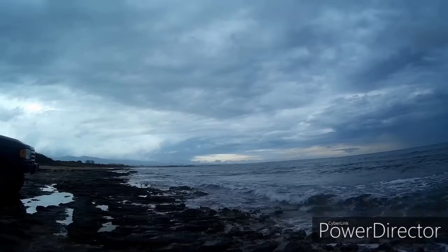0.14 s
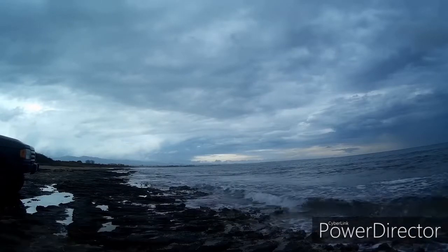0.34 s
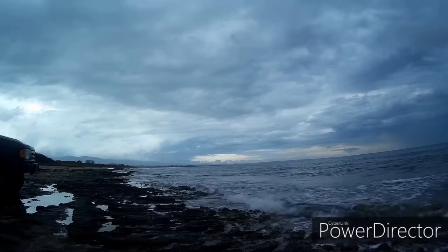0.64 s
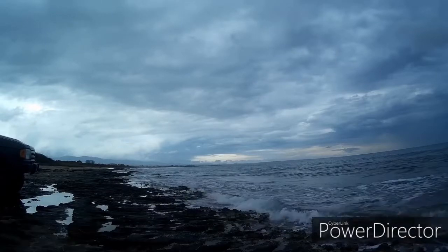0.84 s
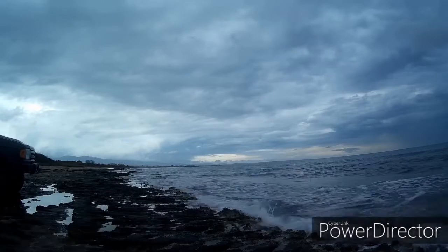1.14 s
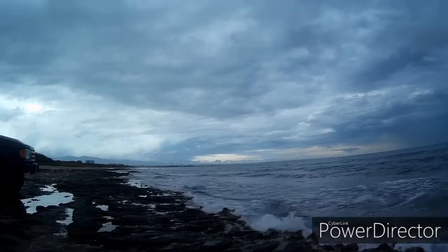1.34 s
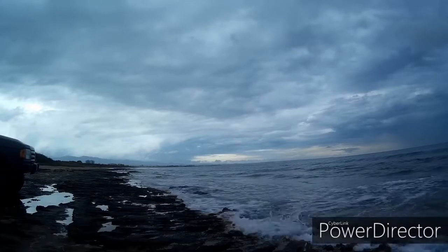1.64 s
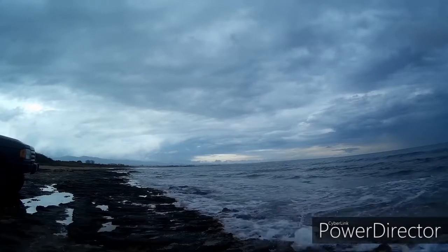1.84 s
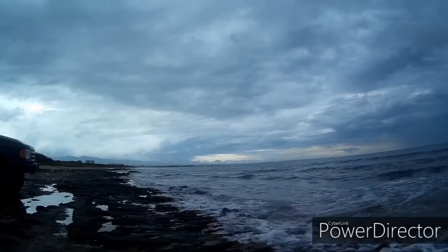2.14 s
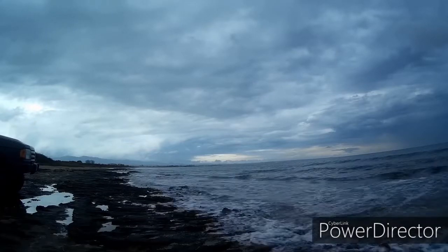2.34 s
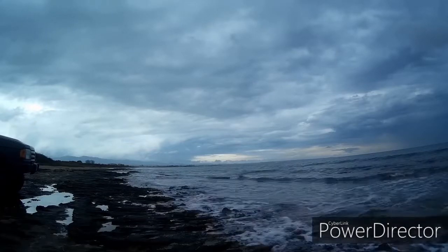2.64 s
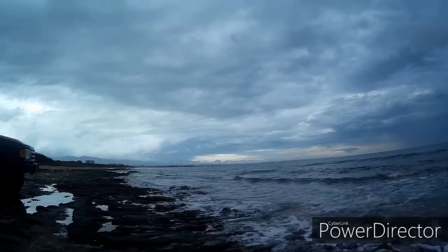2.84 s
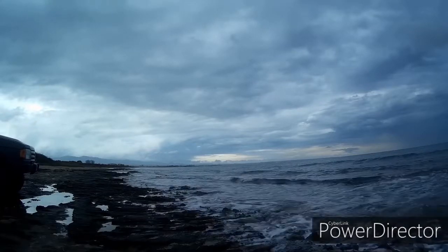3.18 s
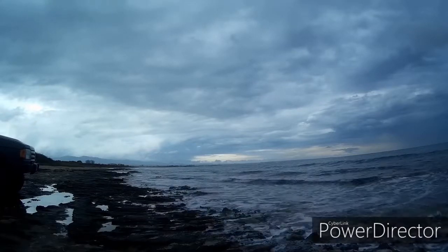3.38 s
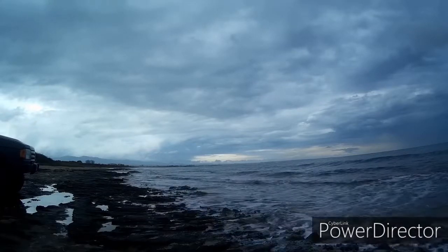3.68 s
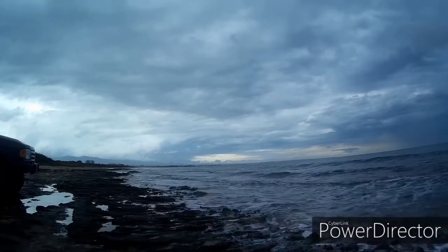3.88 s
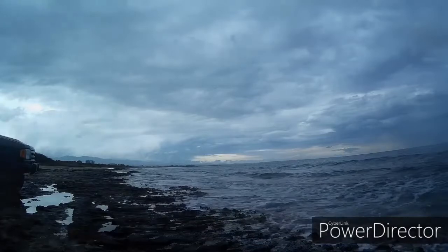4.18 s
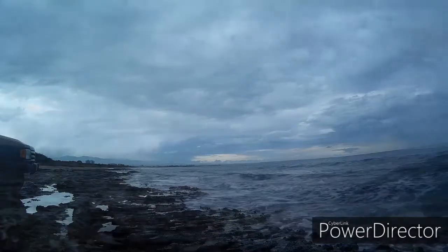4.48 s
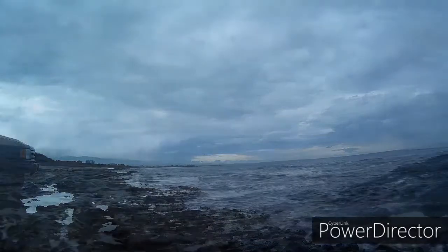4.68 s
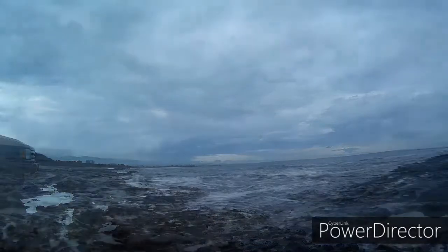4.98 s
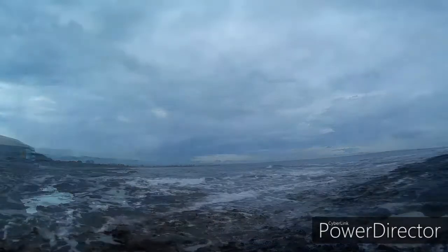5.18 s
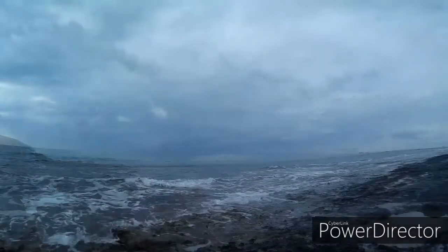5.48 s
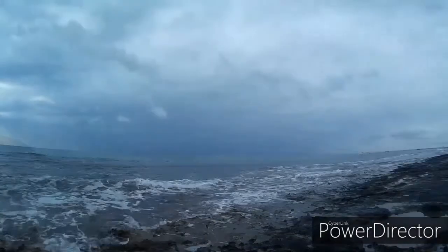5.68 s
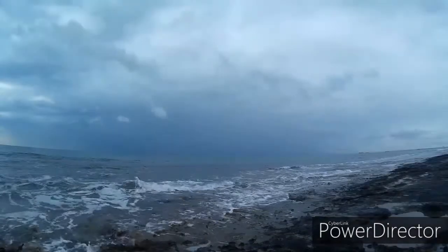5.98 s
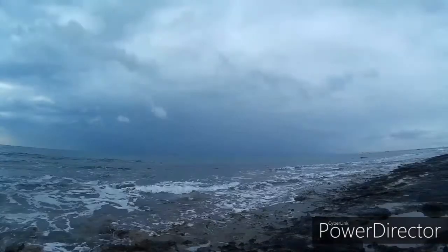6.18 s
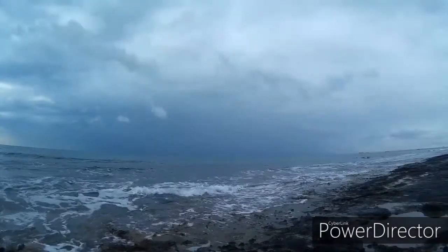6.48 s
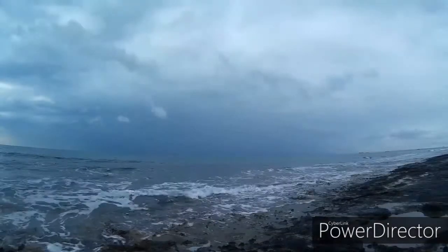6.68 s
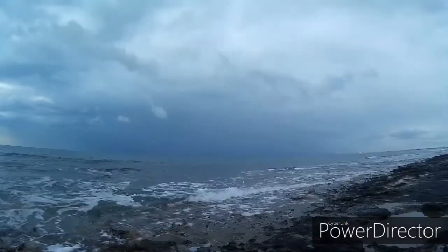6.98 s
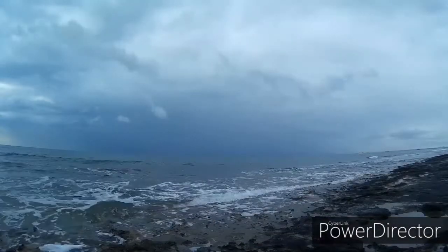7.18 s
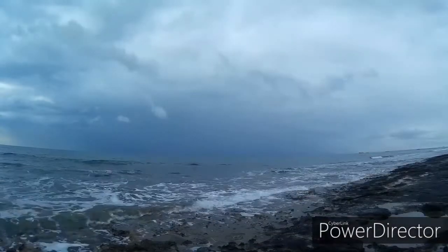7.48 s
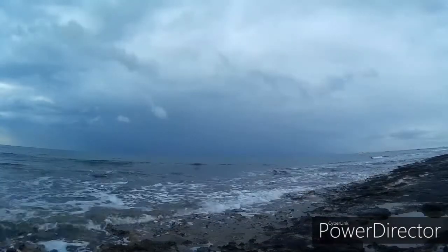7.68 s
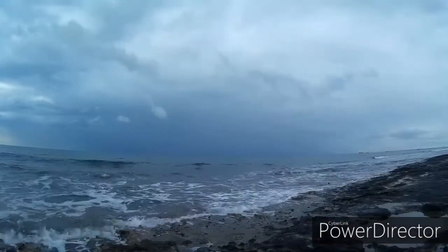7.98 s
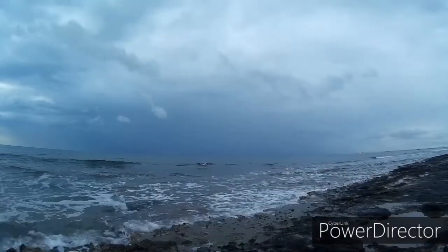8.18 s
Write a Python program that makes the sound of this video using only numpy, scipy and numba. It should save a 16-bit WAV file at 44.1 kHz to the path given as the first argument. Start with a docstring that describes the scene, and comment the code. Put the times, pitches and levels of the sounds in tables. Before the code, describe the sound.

Outdoors by the sea, a muffled, mid-heavy wash of bubbles blends with a smooth roar of farther breakers. Three surges come: strong early, gentler in the middle, strong again at the end. Hollow water slaps and tiny spray ticks ride on the breaks. Between them remain soft wind rumble, a faint wavering low hum and thin steady hiss; the tone shifts slightly midway.

```python
"""Flat rocks on a shore, heard from a small camera in a closed housing: three waves break and drain. The surf
is a swarm of ringing bubbles over a smooth noise roar of farther breakers. Water slaps and spray drops are
quick bubble clusters; filtered noise makes wind rumble, a wavering hum and microphone hiss. Partway the colour
of the surf and the hum level shift."""
import sys
import numpy as np
from scipy import signal
from scipy.fft import rfft, irfft
from scipy.io import wavfile
from scipy.ndimage import uniform_filter1d, map_coordinates
from numba import njit

SR = 44100
rng = np.random.default_rng(int(sys.argv[2]) if len(sys.argv) > 2 else 0)


def put_to_file(sound):
    """Save the sound as 16-bit audio at rate SR, in the file named by the first command-line argument."""
    columns = np.atleast_2d(sound).T  # one column per channel
    safe = np.clip(columns, -1, 1)
    whole_steps = np.round(safe * 32767)
    wavfile.write(sys.argv[1], SR, whole_steps.astype(np.int16))


def decibels_to_gain(level_db):
    """Convert a level in decibels to a linear amplitude gain (20 dB per decade)."""
    exponent = np.asarray(level_db, float) / 20
    return 10 ** exponent


N = 367353
T = np.arange(N) / SR

# middle pitch of the surf's parts, low to high: pockets, wash, upper wash, spray, fizz [f/Hz]
PART_PITCH = [170, 650, 1900, 4200, 9000]
# broad colour of sound through the housing [f/Hz, density level/dB]
HOUSING_COLOUR = [(24, -66), (40, -26), (139, -7), (207, -3), (426, -0.5), (533, -1), (835, -1),
                  (1180, -4.5), (1680, -5.5), (3130, -28), (4010, -30.5), (4900, -37.5), (8260, -46),
                  (11700, -56), (15400, -73)]
# start and end of the shift in colour and hum [t/s]
SHIFT_TIMES = [4.82, 5.45]


def unit(x):
    """Scales a signal to rms 1."""
    return x / np.sqrt(np.mean(x ** 2))


def read(points, hz):
    """Level in dB of a spectrum at hz, in straight lines over log frequency."""
    f, db = np.transpose(points)
    return np.interp(np.log(np.maximum(hz, 1)), np.log(f), db)


def tint(x, points):
    """Filters causally to the given spectrum: minimum phase from the folded cepstrum."""
    size = 2 ** 13
    hz = np.arange(size // 2 + 1) * SR / size
    cepstrum = irfft(np.log(decibels_to_gain(read(points, hz))))
    cepstrum[1:size // 2] *= 2
    cepstrum[size // 2 + 1:] = 0
    impulse = irfft(np.exp(rfft(cepstrum)))
    return signal.fftconvolve(x, impulse)[:N]


def walk(rate):
    """Slow random drift: levels held 1 / rate s, smoothed twice, rms 1."""
    hold = int(SR / rate)
    steps = np.repeat(rng.standard_normal(N // hold + 1), hold)
    smooth = uniform_filter1d(uniform_filter1d(steps, hold), hold)
    return unit(smooth[:N])


def shifted():
    """Progress of the shift in colour and hum, from 0 before to 1 after."""
    return np.interp(T, SHIFT_TIMES, [0, 1])


def part_place(hz):
    """Fractional place of a pitch among the surf's parts, over log frequency."""
    return np.interp(np.log(np.maximum(hz, 1)), np.log(PART_PITCH), np.arange(len(PART_PITCH)))


@njit
def ring(start, hz, cycles, size, glide, length, sr):
    """Each bubble is a damped sine whose pitch rises as it nears the surface."""
    out = np.zeros(length)
    for k in range(len(start)):
        span = cycles[k] * sr / hz[k]  # decay time in samples
        state = size[k] + 0j
        step = np.exp(2j * np.pi * hz[k] / sr - 1 / span)
        bend = np.exp(2j * np.pi * hz[k] / sr * glide / span)
        for i in range(start[k], min(length, start[k] + int(5 * span) + 2)):
            out[i] += state.imag
            state, step = state * step, step * bend
    return out


def force():
    """Force and foam of the surf in relative dB, as the waves rise, break and drain."""
    # three waves; foam is how much fine froth brightens the wash [t/s, force/dB, foam/dB]
    surge = [(0.0, -30.5, 0.5), (0.2, -32, 2), (0.55, -27.5, 1), (0.66, -28, 1), (0.79, -22.5, -2),
             (0.86, -27, 1), (0.9, -23.5, -0.5), (1.1, -25, 0.5), (1.36, -25.5, 0.5), (1.47, -29.5, 3),
             (1.66, -27.5, 0.5), (1.75, -29.5, 3), (1.86, -35.5, 4.5), (1.92, -35.5, 1), (2.02, -41, 1),
             (2.22, -43.5, -1.5), (2.45, -39.5, -0.5), (2.68, -41, 1), (2.84, -40, 0), (3.04, -38.5, -1),
             (3.12, -41, -0.5), (3.4, -42.5, 0), (3.75, -39.5, -1.5), (4.15, -43, 0.5), (4.6, -39.5, -1),
             (5.0, -37, 0), (5.28, -34.5, -0.5), (5.35, -31, 0), (5.46, -32.5, 0.5), (5.6, -31, 1),
             (5.84, -31.5, -0.5), (5.91, -34.5, 0), (6.1, -36, -1), (6.35, -35, -0.5), (6.88, -38.5, 0),
             (7.1, -35.5, 0), (7.28, -39, 1), (7.45, -34.5, 0.5), (7.57, -38.5, 0.5), (7.64, -32, 0),
             (7.662, -27, 1.5), (7.73, -24, 1), (7.95, -26, 0.5), (8.33, -27.5, 0)]
    s, force_db, foam_db = np.transpose(surge)
    return np.interp(T, s, force_db), np.interp(T, s, foam_db)


def parts():
    """Relative dB of each part of the surf: all follow the wave and churn together, each flickers alone."""
    # one row per part, low to high [level at middle force/dB, dB per dB of force, dB per dB of foam, change
    # after the shift/dB]
    balance = [(-34, 0.6, -2.4, 0.2), (-33, 1.0, -0.3, 0.18), (-33, 0.9447, 0.86, -0.5),
               (-30.5, 1.16, 1.01, -4.5), (-28.5, 1.21, 1.6, 2)]
    middle_force_db = -33
    force_db, foam_db = force()
    turn = shifted()
    froth_db = foam_db + 0.85 * walk(9)  # froth comes in patches
    churn_db = 0.66 * walk(70) + 0.61 * walk(18)
    levels = []
    for db, follow, froth, shift_db in balance:
        wave_db = db + follow * (force_db - middle_force_db) + froth * froth_db
        flicker_db = 0.55 * walk(7.7) + 0.73 * walk(30)
        levels.append(wave_db + shift_db * turn + churn_db + flicker_db)
    return np.array(levels)


def bubbles(part_db):
    """A swarm of trapped bubbles rings, low pitches more numerous per Hz; a few stand out of the crowd."""
    per_s, scatter_db = 12000, 2.5
    when, pitch, luck, turns = rng.random((int(per_s * N / SR), 4)).T
    start = (when * N).astype(np.int64)
    hz = 70 + 15000 * pitch ** 1.3
    db = map_coordinates(part_db, [part_place(hz), start], order=1)
    # the scatter narrows for pitches under 3 kHz
    db = db - scatter_db * np.log(1.0003 - luck) * np.minimum(hz / 3000, 1) ** 0.58
    # sized so that the swarm is near white before the housing colours it
    size = decibels_to_gain(db) * (hz / 1000) ** 0.56
    return ring(start, hz, 0.61 + 3.75 * turns, size, 0.02, N, 1. * SR)


def roar(part_db):
    """Farther breakers blur into noise, one band per part, crossfaded over log frequency."""
    place = part_place(np.arange(N // 2 + 1) * SR / N)
    noise = rfft(rng.standard_normal(N))
    out = np.zeros(N)
    for k, db in enumerate(part_db):
        band = np.clip(1 - abs(place - k), 0, 1)
        out += decibels_to_gain(db) * irfft(noise * band, N)
    return out


def housing(x):
    """The closed case dulls the sound and rings in the treble, differently after the shift near 5 s."""
    # rings and dips of the case, one list before and one after the shift [f/Hz, width/Hz, level/dB]
    cavities = ([(4000, 370, 3.5), (7700, 500, 0), (8540, 550, -3), (10260, 1050, 4.5), (12100, 800, 6.5)],
                [(4100, 600, 5.5), (7100, 440, 3), (8260, 900, 5), (10500, 1000, 4.5), (11500, 800, 4)])
    grid_hz = np.geomspace(20, 20000, 400)
    views = []
    for resonances in cavities:
        colour_db = read(HOUSING_COLOUR, grid_hz)
        for hz, width, db in resonances:
            colour_db = colour_db + db / (1 + (2 * (grid_hz - hz) / width) ** 2)
        views.append(tint(x, np.transpose([grid_hz, colour_db])))
    turn = shifted()
    return (1 - turn) * views[0] + turn * views[1]


def rumble():
    """Wind rumble: low-tinted noise whose level drifts slightly."""
    # spectrum of the wind [f/Hz, relative density level/dB]
    wind_colour = [(20, -1), (40, 0), (60, -4), (100, -0.5), (160, -30)]
    level_db = -58.5 + 0.5 * walk(3.22)
    return decibels_to_gain(level_db) * unit(tint(rng.standard_normal(N), wind_colour))


def hum():
    """A faint low hum: narrow-band noise that wavers, weaker after the shift."""
    # middle level before and after the shift [level/dB]
    hum_levels = [-61.5, -65]
    band = signal.butter(2, [55, 65], "band", fs=SR, output="sos")
    db = np.interp(T, SHIFT_TIMES, hum_levels) + 2.5 * walk(3.5)
    return decibels_to_gain(db) * unit(signal.sosfilt(band, rng.standard_normal(N)))


def hiss():
    """Steady microphone hiss: tinted noise at a fixed level."""
    # spectrum of the hiss [f/Hz, relative density level/dB]
    hiss_colour = [(1500, 21), (4000, -15), (9000, 8), (13000, 7), (15400, -10)]
    return decibels_to_gain(-85) * unit(tint(rng.standard_normal(N), hiss_colour))


def burst(events, ms, count, focus):
    """Each event traps a quick cluster of bubbles round its pitch, thickest at the start."""
    s, peak_db, hz, spread = (np.repeat(column, count) for column in np.transpose(events))
    # a cluster of like sizes rings longer: a plop rather than a splash
    cycles = focus / np.clip(spread, .1, 2)
    late, detune, sign = rng.random((len(s), 3)).T
    late[::count] = 0  # the first bubble leads its cluster
    start = ((s + .001 + late ** 1.5 * ms / 1000) * SR).astype(np.int64)
    pitch = np.minimum(hz * np.exp(spread * (detune - .5)), .4 * SR)
    # bubbles ringing at the same moment share the peak
    together = 1 + count * cycles / hz / (ms / 1000)
    # the broad dulling of the case is made up for in advance
    gain = decibels_to_gain(peak_db - read(HOUSING_COLOUR, pitch)) / np.sqrt(together)
    size = np.sign(sign - .5) * gain
    return ring(start, pitch, cycles * pitch / hz, size, 0.017, N, 1. * SR)


def slaps():
    """Water slaps rock and traps bubble clusters: narrow ones plop, wide ones splash."""
    # slaps on the rock [t/s, nominal peak level/dB, f/Hz, spread of pitch as a natural-log range]
    slap_events = [(0.569, -25, 708, 0.55), (0.727, -21, 1030, 0.59), (0.799, -12, 710, 0.91),
                   (0.874, -17, 440, .6), (0.892, -14, 594, 0.58), (0.935, -17, 660, 0.44),
                   (0.949, -19, 665, 0.71), (1.199, -17.5, 760, 0.55), (1.305, -14, 716, 0.54),
                   (1.644, -16.5, 880, 0.45), (1.679, -17, 750, .5), (2.495, -34, 478, .5),
                   (2.848, -24, 416, 0.56), (3.039, -31, 285, 0.5), (3.132, -30.5, 1330, 0.25),
                   (4.97, -18.5, 198, .3), (5.189, -24, 504, 0.57), (5.409, -18, 690, 0.51),
                   (5.497, -10.5, 710, 0.95), (5.511, -14, 820, 0.96), (5.586, -16.5, 800, 1),
                   (5.664, -20.5, 780, .5), (5.774, -25, 635, 0.32), (5.949, -24, 554, 0.36),
                   (6.179, -24, 820, 0.56), (7.008, -27, 533, .45), (7.359, -26, 637, .6),
                   (7.659, -15, 738, 0.34), (7.696, -8, 750, .45), (7.766, -18, 430, .4),
                   (7.849, -20, 643, .4), (7.882, -14.5, 1720, 0.2), (8.129, -21, 425, .45),
                   (8.259, -21, 790, 0.67)]
    return burst(slap_events, ms=12, count=14, focus=0.77)


def stray_drops(count):
    """Drops at random moments, as strong as the wave that throws them: time, level and pitch."""
    low_hz, high_hz = 5200, 8400
    when, pitch = rng.random((count, 2)).T
    db = force()[0][(when * N).astype(int)] - 18.5
    return np.transpose([when * N / SR, db, low_hz + pitch * (high_hz - low_hz)])


def spray():
    """Spray lands close by: clear drops and strays tick as tiny high bubble clusters."""
    # the clearest drops [t/s, nominal peak level/dB, f/Hz]
    clear_drops = [(0.5776, -40, 5390), (0.7527, -47, 6700), (1.1937, -39, 5200), (1.2555, -43, 5810),
                   (1.7, -43, 6860), (1.7355, -45, 7050), (1.7868, -47, 7140), (1.828, -45, 6500),
                   (2.0454, -50, 6310), (2.0787, -52, 5460), (2.4354, -51, 5430), (5.234, -56, 8120),
                   (5.3622, -48, 8270), (5.5034, -44, 7880), (5.5157, -39.5, 6950), (5.528, -47, 7500),
                   (5.5865, -43.5, 7560), (5.595, -45, 7000), (5.7478, -50, 5730), (7.65, -49, 7360),
                   (7.81, -41, 4400), (8.2686, -46, 8450)]
    spread = 0.64
    events = [(*row, spread) for row in [*clear_drops, *stray_drops(count=40)]]
    drops = burst(events, ms=7, count=60, focus=1.0)
    # the spray ticks carry nothing below about 3 kHz
    return signal.sosfilt(signal.butter(6, 3300, "high", fs=SR, output="sos"), drops)


def scene():
    """Near bubbles and far roar share the housing's colour; slaps, spray, wind rumble and hum join them."""
    part_db = parts()
    wash = decibels_to_gain(part_db[1])
    near = housing(bubbles(part_db))
    far = housing(roar(part_db))
    # each layer is levelled against the moving gain of the wash
    near = near / np.sqrt(np.mean((near / wash) ** 2))
    far = far / np.sqrt(np.mean((far / wash) ** 2))
    surf = decibels_to_gain(-0.5) * near + decibels_to_gain(-1.0) * far
    return (surf + rumble() + hum() + housing(slaps() + spray()))[None]


def low_pass(x):
    """Removes everything above the highest recorded frequency."""
    return signal.sosfilt(signal.butter(12, 15480, fs=SR, output="sos"), x)


def record(dry):
    """The microphone adds its own steady hiss to the scene."""
    mix = dry + hiss()
    return low_pass(mix)


dry = scene()
out = record(dry)
put_to_file(out)
```